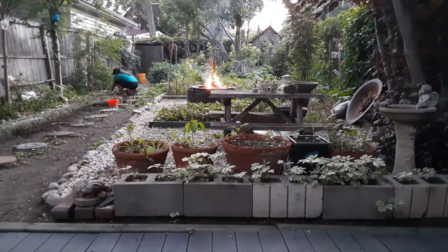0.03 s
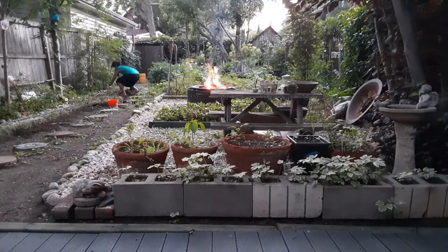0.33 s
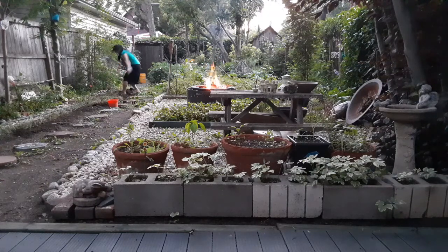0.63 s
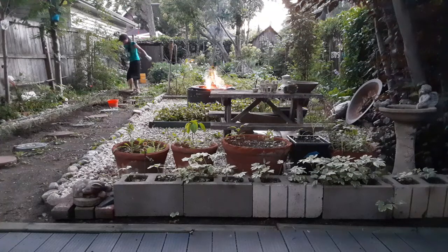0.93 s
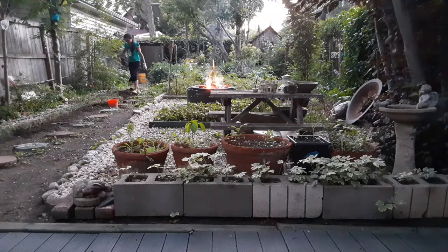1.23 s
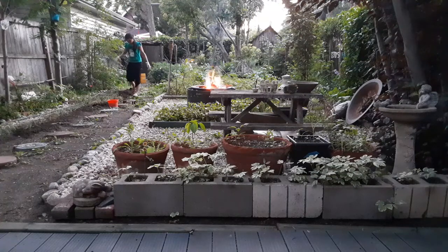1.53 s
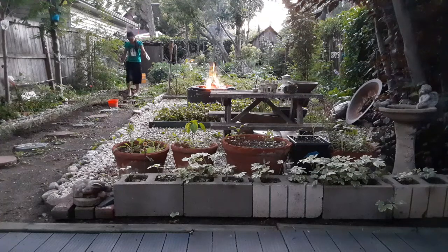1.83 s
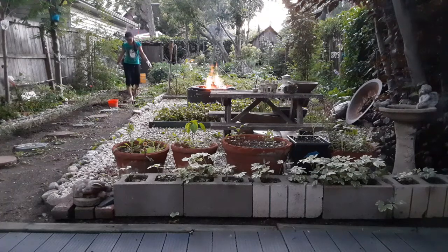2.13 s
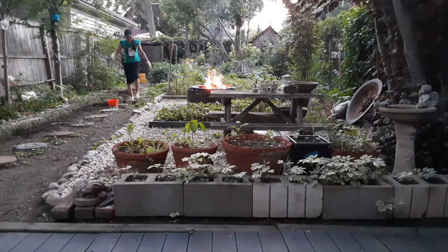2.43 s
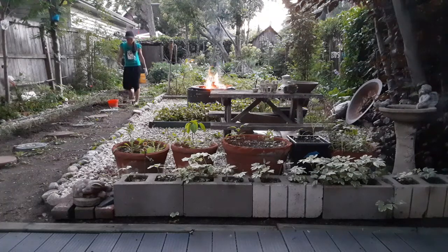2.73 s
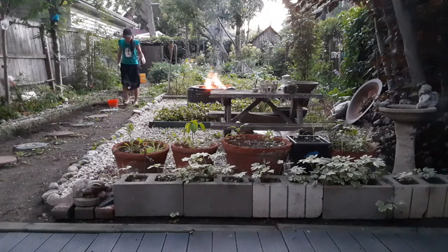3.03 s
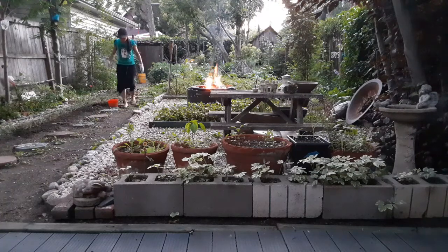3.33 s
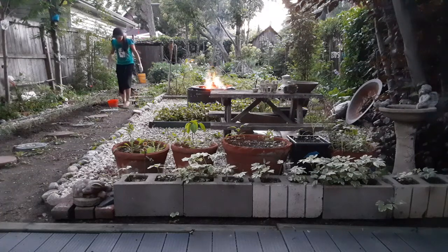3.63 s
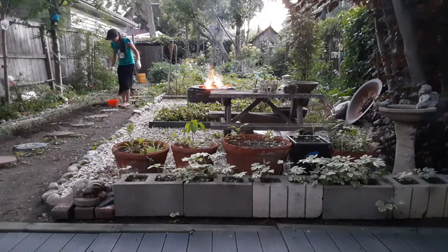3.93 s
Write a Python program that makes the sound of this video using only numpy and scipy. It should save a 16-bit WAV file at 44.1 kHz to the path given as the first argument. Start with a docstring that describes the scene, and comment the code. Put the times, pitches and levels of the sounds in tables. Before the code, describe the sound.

Clothing rustles softly with three muffled bumps over low outdoor background noise.

```python
"""Rustling on a garden porch

Something soft and close, probably clothing, rustles, ticks and bumps three times. Each bump is a quick
cluster of contacts that the porch walls faintly echo; the two louder bumps lie over deep booms.
Behind them is a quiet town garden: distant traffic, a fine hiss, one more boom on its own,
and the hum of a machine, probably an air conditioner."""
import sys
import numpy as np
from scipy import signal
from scipy.fft import rfft, irfft, next_fast_len
from scipy.io import wavfile
from scipy.ndimage import map_coordinates

SR = 44100
rng = np.random.default_rng(int(sys.argv[2]) if len(sys.argv) > 2 else 0)


def store_pcm(level_fs):
    """Save levels as 16-bit WAV."""
    pcm = np.round(np.clip(level_fs, -1, 1) * 32767).astype(np.int16)
    wavfile.write(sys.argv[1], SR, np.atleast_2d(pcm).T)


N = 176400
TIME = np.arange(N) / SR
BUMP_ATTACK_S, HUM_AND_BOOM_PAN_DB = 0.0009, 4


def bumps():
    """Each soft contact makes a thud, a hollow clop, a knock, a scuff and a low push as the floor gives."""
    # Each row: start in seconds, level in dB, then clop, knock, scuff and push in dB added to it.
    contacts = [(2.0641, -38, -1.5, -4, -9, -12), (2.0715, -37.5, 0, -17, -8.5, -7),
                (2.0764, -44, -3, -2, -5, -4), (2.689, -50.5, -1.5, -1, -3.5, -8),
                (2.802, -46.5, 1.5, -4, -4, -11), (2.808, -49.5, -1, -9, -6.5, 3),
                (3.148, -41, -2, -1, -12, -10), (3.155, -36.5, -3.5, -1.5, -14, 1),
                (3.16, -42.5, -2, 3, -14, -3), (3.179, -50, -13, -11, -20, 9),
                (3.215, -49.5, -8, -3, -20, 6)]
    # Each row in these four: pitch in Hz, relative level in dB, seconds to fade by 60 dB.
    thud = [(193, 5.5, 0.04), (211.7, 0.5, 0.11), (267, 2, 0.05)]
    clop = [(331, 9.5, 0.036), (441, 2.5, 0.051), (526, -2, 0.03)]
    knock = [(620, 8.5, 0.02), (772, 11, 0.016), (870, 7, 0.018), (1005, 0.5, 0.016)]
    push = [(85, -2, 0.054), (135, 4.5, 0.058)]
    # Each row: frequency in Hz, relative level in dB.
    scuff_colour = [(300, -17), (900, 8.5), (2500, 0), (4000, -12), (8000, -42), (16000, -31)]
    scuff, out = noise(scuff_colour), np.zeros((2, N))
    for start, db, clop_db, knock_db, scuff_db, push_db in contacts:
        body = ring(thud) + amp(clop_db) * ring(clop)
        body += amp(knock_db) * ring(knock) + amp(push_db) * ring(push)
        out[:, round(start * SR):][:, :len(body)] += amp(db - 5) * body
        out += amp(db + scuff_db) * burst(start, fade=0.033, attack=BUMP_ATTACK_S) * scuff
    return out * pan(3)


def ring(modes, scatter_db=1.2, cutoff_hz=1070):
    """Tones fade after a contact, a bit different each time; the soft padding dulls the treble."""
    t = np.arange(SR // 4) / SR
    tones = sum(amp(db + scatter_db * rng.standard_normal() - 60 * t / fade) * np.sin(2 * np.pi * hz * t)
                for hz, db, fade in modes)
    padding = signal.butter(4, cutoff_hz, fs=SR, output="sos")
    return signal.sosfilt(padding, (1 - np.exp(-t / BUMP_ATTACK_S)) * tones)


def cloth():
    """Strokes of cloth swish and fade; pressure adds a low rub, light contact a high sizzle."""
    # Each row: peak time in seconds, level in dB, rise and fall in seconds per 8.7 dB,
    # then rub and sizzle in dB added to the level.
    strokes = [ (.33, -79.5, 0.082, 0.24, 6, 0), (.475, -73, 0.026, 0.029, -2, 7),
               (.6, -75.5, 0.17, 0.17, 1.5, -2), (.81, -72.5, 0.24, 0.23, -2.5, -1),
               (.98, -73.5, 0.031, 0.054, -7, -3), (1.15, -78.5, 0.23, 0.3, 6, 0),
               (1.406, -65.5, 0.0057, 0.044, -3, 4), (1.445, -68.5, 0.044, 0.14, 1.5, -4),
               (1.87, -80.5, .03, 0.051, 5, -1), (1.94, -75.5, 0.051, 0.32, 2, 7),
               (2.044, -63, 0.0054, 0.054, 2.5, -1), (2.085, -63, 0.027, 0.057, 3, -2),
               (2.205, -70.5, 0.022, 0.045, -1, 2), (2.39, -76, 0.091, 0.25, -4, -1),
               (2.51, -75.5, 0.023, 0.088, -7, 5.5), (2.66, -68.5, 0.031, 0.073, 2, 2),
               (2.715, -67, 0.028, 0.11, -2, -2), (2.812, -68.5, 0.011, 0.045, 3, -1),
               (2.96, -81, 0.056, 0.17, 6, 9), (3.162, -61.5, 0.024, 0.04, 5.5, 0),
               (3.32, -75.5, 0.39, 0.39, 6, -3), (3.465, -78, 0.022, 0.036, -5, 6),
               (3.539, -62, .004, 0.034, -6.5, -2), (3.69, -63.5, 0.12, 0.11, -3.5, 1.5)]
    # Each row in these three: frequency in Hz, relative level in dB.
    rub_colour = [(120, -27), (220, 8.5), (500, 11.5), (1000, 2.5), (2000, 1.5), (3000, -1), (4200, 0),
                  (5500, -6), (8000, -26)]
    swish_colour = [(2500, -25), (4500, 0), (6000, -0.5), (8500, 0.5), (10500, -1), (12500, -1),
                    (16000, -25)]
    sizzle_colour = [(8000, -11), (10500, -3), (11800, 2.5), (14000, -1.5), (16000, 0)]
    power = np.zeros((3, N))
    for peak, db, rise, fall, rub_db, sizzle_db in strokes:
        shape = np.exp(-np.maximum((peak - TIME) / rise, (TIME - peak) / fall))
        power += (amp([[db + rub_db], [db], [db + sizzle_db]]) * shape) ** 2
    rub, swish, sizzle = np.sqrt(power)
    return fibres() * (amp(4.5) * rub * noise(rub_colour) * pan(3)
                       + swish * noise(swish_colour) * pan(1)
                       + amp(-0.5) * sizzle * noise(sizzle_colour) * pan(-3.5))


def fibres(catches_per_s=1000, snaps_per_s=25, snap_s=0.00084):
    """Fibres catch and slip, roughening the cloth's level; it jumps briefly when one snaps free."""
    grain = amp(wobble(catches_per_s))
    snaps = (rng.random(N) < snaps_per_s / SR) * rng.random(N)
    jumps = signal.lfilter([1], [1, -np.exp(-1 / (snap_s * SR))], snaps)
    return unit(grain * (1 + amp(5.5) * jumps))


def ticks():
    """Tiny bursts of bright noise."""
    # Each row: start in seconds, level in dB, seconds to fade by 60 dB.
    snaps = [(1.931, -62.5, .1), (2.809, -54, .006), (3.5283, -40.5, 0.0045), (3.539, -51, .006)]
    # Each row: frequency in Hz, relative level in dB.
    colour = [(3000, -5), (7500, -7), (11000, 11), (13000, 11), (16000, 2)]
    return noise(colour) * sum(amp(db) * burst(start, fade, attack=0.0002) for start, db, fade in snaps)


def booms():
    """Deep tones swell and fade; the last two lie under the loudest bumps."""
    # Each row: peak time in seconds, level in dB, pitch in Hz, half-width in seconds.
    swells = [(1.55, -45.5, 60, 0.065), (2.04, -50.5, 53, 0.2), (3.2, -53.5, 55.5, 0.24)]
    tones = sum(amp(db) * np.exp(-((TIME - peak) / width) ** 2)
                * np.sin(2 * np.pi * (hz * TIME + rng.random())) for peak, db, hz, width in swells)
    return tones * pan(HUM_AND_BOOM_PAN_DB)


def porch(x, tail_s=0.18, tail_db=-15.5):
    """Two near walls send back quick echoes, followed by a short, blurred tail."""
    # Each row: echo delay in seconds, gain.
    walls = [(.0066, 0.15), (0.0105, 0.2)]
    early = filtered(x, lambda hz: 1 + sum(gain * np.exp(-2j * np.pi * hz * s) for s, gain in walls))
    t = np.arange(SR // 2) / SR
    tail = rng.standard_normal((2, len(t))) * amp(-60 * t / tail_s)
    tail /= np.linalg.norm(tail[0])
    return early + amp(tail_db) * signal.fftconvolve(early, tail, axes=1)[:, :N]


def town():
    """Far traffic rumbles and its tyres make a soft wash, under a steady fine hiss."""
    # Each row in these three: frequency in Hz, relative level in dB.
    rumble_colour = [(20, -12), (40, -7), (46, -7), (51, -0.5), (72, 9.5), (82, 6), (95, -0.5), (140, 4),
                     (190, -5), (235, -4), (300, -21.5), (600, -66)]
    tyre_colour = [(120, -30), (220, 0), (370, 0), (410, -4), (448, 1), (490, -4.5), (800, -1), (1100, -2),
                   (1400, -8), (2000, -13.5), (3000, -23.5), (5000, -44.5)]
    hiss_colour = [(1650, -23), (2800, -19), (3230, -8), (3630, 1.5), (5640, -3), (7630, -16),
                   (8380, -10.5), (9340, -13), (11000, -1.5), (15700, 3)]
    # Each row in these two: time in seconds, relative level in dB.
    rumble_swell = [(0, -61), (.3, -54.5), (1.75, -57.5), (2.0, -56.5), (2.3, -59), (3.0, -55.5),
                    (3.2, -58), (3.45, -56.5), (4, -57.5)]
    tyre_swell = [(0, -1.5), (.2, -1), (.38, 2), (.8, -0.6), (1.6, 0.5), (4, -0.5)]
    rumble = amp(2 + curve(rumble_swell)) * air(rumble_colour)
    tyres = amp(-57 + curve(tyre_swell) + 0.54 * wobble(1.9)) * air(tyre_colour)
    return rumble + tyres + amp(-69) * air(hiss_colour)


def machine(drift_radians=0.4):
    """A motor and fan hum; each tone wavers a little in level and pitch."""
    # Each row: pitch in Hz, level in dB, waver in dB.
    tones = [(58.35, -60, 0.5), (120.1, -55, 2), (163, -62, 0.5), (208.6, -75, 8.5), (599, -78.5, 1)]
    hum = sum(amp(db + waver_db * wobble(5.225))
              * np.sin(2 * np.pi * (hz * TIME + rng.random()) + drift_radians * wobble(5.89))
              for hz, db, waver_db in tones)
    return np.sqrt(2) * hum * pan(HUM_AND_BOOM_PAN_DB)


def air(colour):
    """Outdoor noise: alike in both ears in the bass, wide above, mostly louder on the open left side."""
    # Each row: frequency in Hz, how alike left and right are (-1 to 1).
    likeness = [(60, 1), (150, 0.92), (280, 0.66), (500, 0.73), (1000, -0.36), (2000, -0.073),
                (4000, -0.047), (12000, -0.043)]
    # Each row: frequency in Hz, left minus right in dB.
    balance = [(50, 8.5), (150, -1.5), (300, 1), (1000, 1.5), (2500, 3), (4500, 3), (7500, -1.5),
               (13000, 0)]
    angle = lambda hz: np.arccos(along(likeness, hz)) / 2
    mid, side = filtered(noise(colour), lambda hz: np.array([np.cos(angle(hz)), np.sin(angle(hz))]))
    return unit(filtered(np.array([mid + side, mid - side]), lambda hz: pan(along(balance, hz))))


def amp(db):
    """Turn decibels into a gain."""
    return 10 ** (np.asarray(db) / 20)


def unit(x):
    """Scale to an average power of 1."""
    return x / np.sqrt(np.mean(x ** 2) + 1e-20)


def pan(db):
    """Left and right gains, with the left louder by db."""
    return amp(np.array([[.5], [-.5]]) * db)


def along(points, hz):
    """Read between (Hz, value) points on a log frequency scale."""
    freqs, values = np.transpose(points)
    return np.interp(np.log(hz + 1), np.log(freqs + 1), values)


def curve(points):
    """Join (seconds, value) points with straight lines."""
    return np.interp(TIME, *np.transpose(points))


def wobble(rate):
    """A smooth curve through `rate` random values a second."""
    return map_coordinates(rng.standard_normal(N // 8), [np.arange(N) * rate / SR], mode="wrap")


def burst(start, fade, attack):
    """A contact's level: a quick rise, then a fall of 60 dB in `fade` seconds."""
    t = np.maximum(TIME - start, 0)
    return (1 - np.exp(-t / attack)) * amp(-60 * np.minimum(t / fade, 10))


def filtered(x, response):
    """Scale each frequency in x by response(hz)."""
    size = next_fast_len(N + SR // 2)
    return irfft(rfft(x, size) * response(np.fft.rfftfreq(size, 1 / SR)), size)[..., :N]


def noise(colour):
    """Noise shaped by (Hz, dB) points, unrelated left and right."""
    return unit(filtered(rng.standard_normal((2, N)), lambda hz: amp(along(colour, hz))))


def scene():
    """The steady garden with the small near sounds on top."""
    return town() + machine() + booms() + cloth() + ticks() + porch(bumps())


def record(dry, bottom_hz=38.4, top_hz=15740):
    """Cut away the deepest bass and the highest treble."""
    low_cut = signal.butter(6, bottom_hz, btype="highpass", fs=SR, output="sos")
    return filtered(signal.sosfilt(low_cut, dry), lambda hz: hz < top_hz)


dry = scene()
out = record(dry)
store_pcm(out)
```